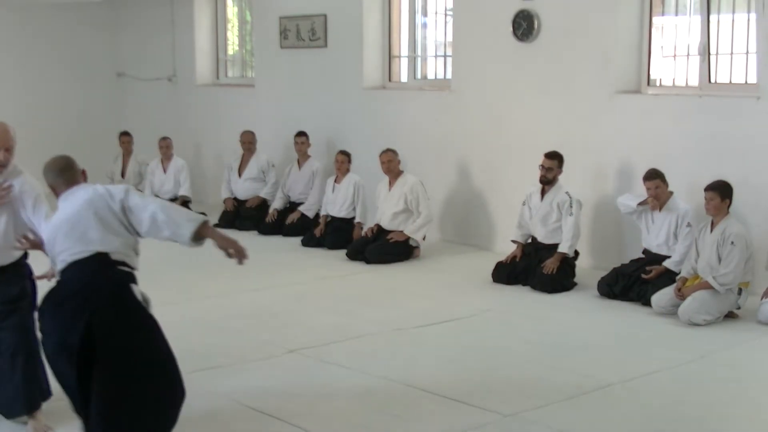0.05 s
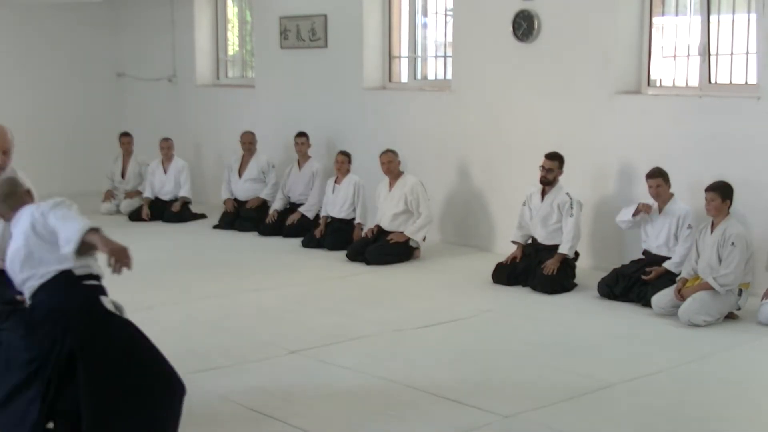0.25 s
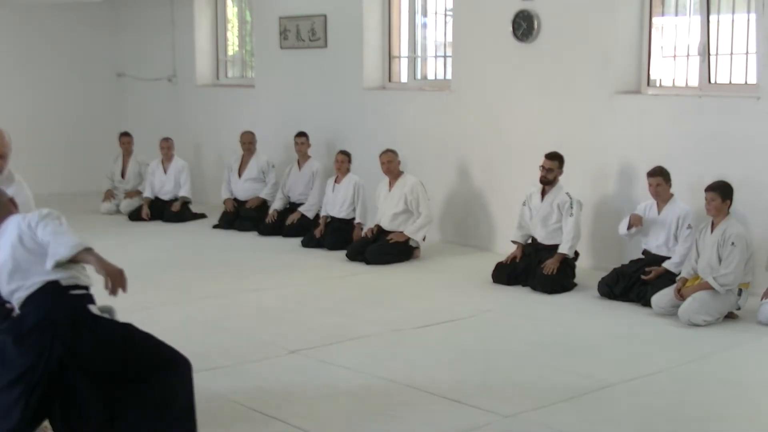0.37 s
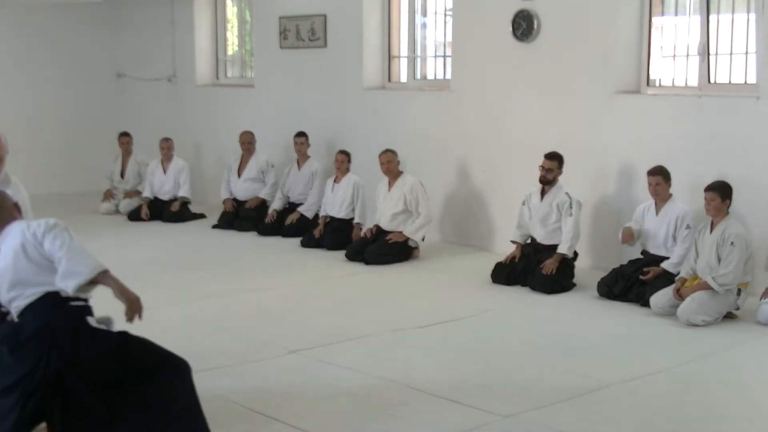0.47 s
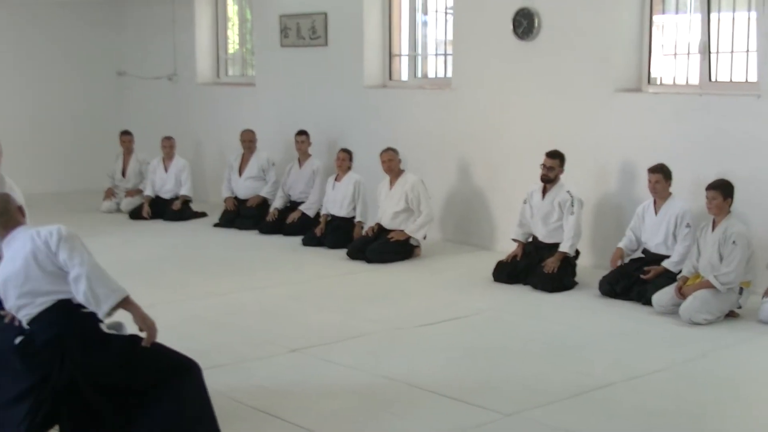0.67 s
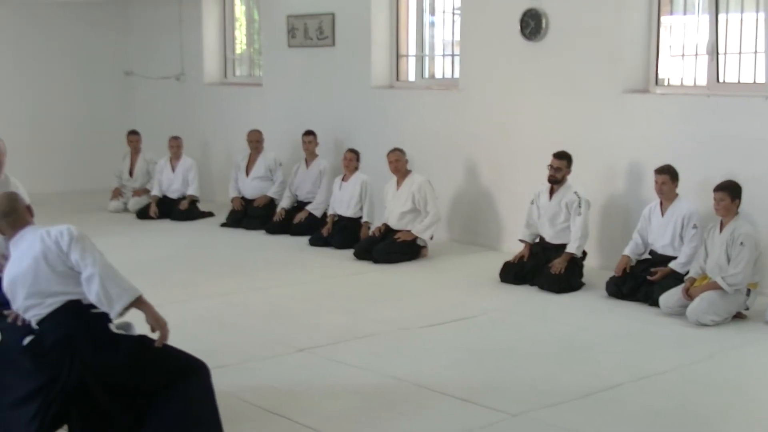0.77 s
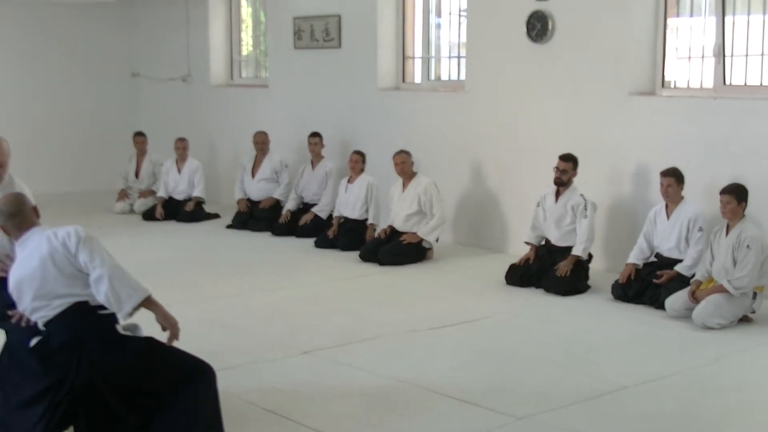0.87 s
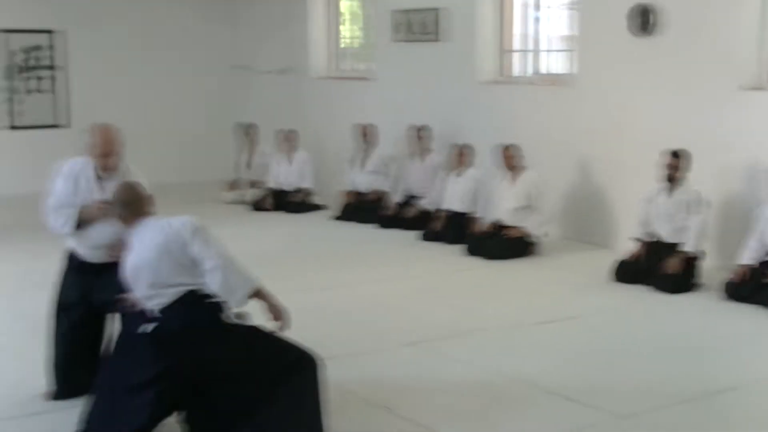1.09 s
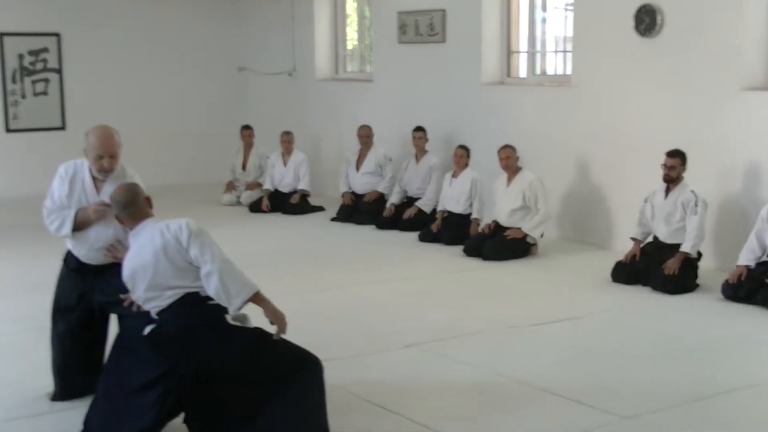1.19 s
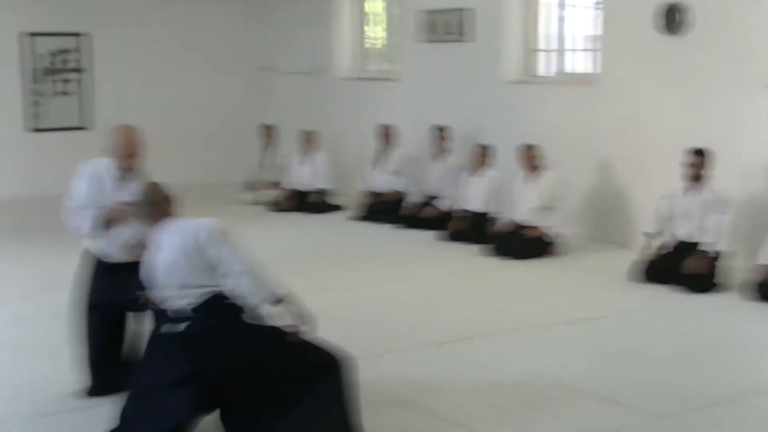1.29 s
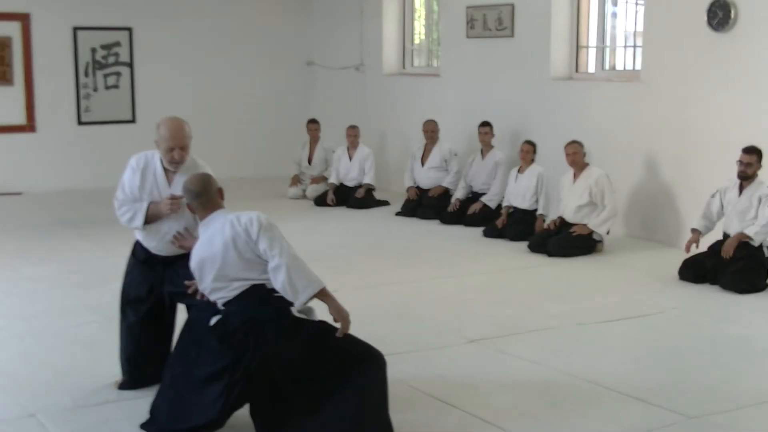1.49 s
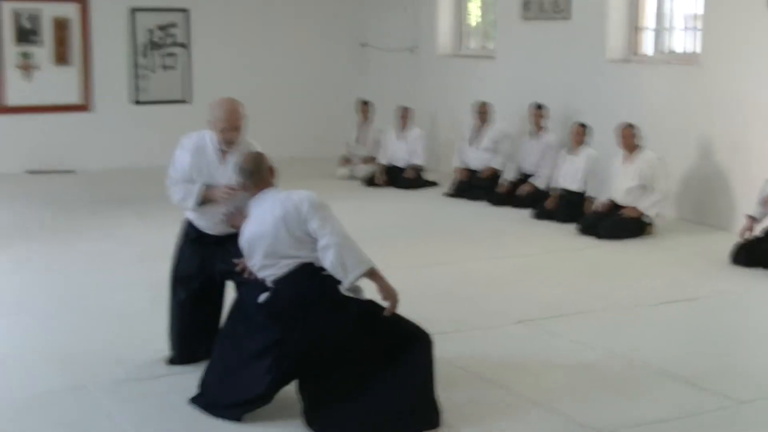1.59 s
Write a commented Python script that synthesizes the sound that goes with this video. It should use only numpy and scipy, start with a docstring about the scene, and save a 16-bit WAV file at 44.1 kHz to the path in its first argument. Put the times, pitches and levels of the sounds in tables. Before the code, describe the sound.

Heavy thud of a fall on a mat in a bare hall, then a nearby camera fires three times

```python
"""Mat landing and three camera frames

A body lands on a padded mat in a bare training hall: bounces sounding as damped oscillations make a deep
thud, bursts of coloured noise make the slaps, grainy hiss the swishing cloth, and a diffuse tail carries on.
Close by, a reflex camera fires three frames: each a hollow mirror clack of ringing body modes and noise,
then a bright shutter click with metal partials; a first curtain precedes it, very faintly in the last frame."""
import sys
import numpy as np
from scipy import signal
from scipy.fft import rfft, irfft
from scipy.io import wavfile
from scipy.ndimage import uniform_filter1d

SR = 44100
rng = np.random.default_rng(int(sys.argv[2]) if len(sys.argv) > 2 else 0)


def how_loud(loudness_db):
    """Turn decibels into a plain amplitude multiplier (0 dB gives 1, 20 dB gives 10)."""
    steps = np.asarray(loudness_db, float) / 20
    return 10 ** steps


def master_out(mix):
    """Clip the mix to full scale and print it as 16-bit PCM to the path in sys.argv[1]."""
    frames = np.transpose(np.atleast_2d(mix))
    ceiling = np.clip(frames, -1, 1)
    pcm = np.round(ceiling * 32767).astype(np.int16)
    wavfile.write(sys.argv[1], SR, pcm)


N = 72765  # length in samples
LEAD = 4410  # samples computed ahead of the start, so that earlier sounds can ring into it

# Room tone spectrum: f/Hz, relative level/dB
AIR_SPECTRUM = [(20, -4), (60, -4), (200, -4.5), (500, -7.5), (1000, -10.5), (1500, -14.5), (4000, -23),
                (9000, -29), (16000, -32)]
# Left-right likeness of the room tone: f/Hz, likeness/1
AIR_LIKENESS = [(60, 0.7), (240, 0.81), (950, 0.71), (3770, 0), (15000, -0.0)]
# Reverberation time of the hall: f/Hz, T60/s
HALL_T60 = [(60, 1.), (150, 0.65), (400, 0.63), (1000, 0.65), (3000, 0.86), (10000, 0.3)]
# Left-right likeness of the hall tail: f/Hz, likeness/1
HALL_LIKENESS = [(60, 1), (250, 0.98), (600, 0.96), (1500, 0.46), (6000, 0.033)]
# Course of the swishing cloth: t/s, level/dB
SWISH_COURSE = [(0.0, -41), (0.01, -44.5), (0.16, -52.5), (0.188, -48), (0.224, -28), (0.232, -59),
                (0.236, -30), (0.398, -48), (0.428, -32.5), (0.484, -44), (0.498, -33.5), (0.508, -45),
                (0.652, -58), (0.75, -63)]
# Spectrum of rubbing cloth: f/Hz, relative level/dB
CLOTH_SPECTRUM = [(410, -8.5), (700, 0), (757, -1), (886, -13), (1120, -12), (1520, -8), (2190, -6),
                  (5840, -11), (16000, -22)]
# Cloth and palms snapping on the mat cover: t/s, level/dB, hall send re slap/dB
SLAPS = [(.2125, -21.5, -8), (.2195, -15, -6), (0.2235, -22, -9), (.2255, -26, -8), (0.2365, -29, -16),
         (0.2397, -20.5, -0.5), (0.4975, -24, -23)]
# Spectrum of a slap: f/Hz, relative level/dB
SLAP_SPECTRUM = [(400, -23), (900, 1), (1600, 5.5), (2600, 4.5), (3500, -7.5), (6000, -5.5), (11500, -6.5),
                 (16000, -25)]
# Bodies and feet hitting the mat, the first just before the start:
# t/s, bounce level/dB, bounce f/Hz, swell/s, boom level/dB
THUMPS = [(-.05, -39, 220, 0.0069, 9), (0.2014, -2.5, 170.1, 0.02128, 14), (0.4357, -21.5, 504, .012, -4.5),
          (0.45, -24, 130, 0.01197, -3), (.49, -22, 100, 0.01867, -12.5)]
# Spectrum of the broad boom of a thump: f/Hz, relative level/dB
BOOM_SPECTRUM = [(25, -40), (60, -28), (100, -2.5), (190, -2), (300, -4.5), (480, -8), (900, -21.5),
                 (1500, -23.5), (3000, -51), (6000, -55)]
# Left-right likeness of the camera noise bursts: f/Hz, likeness/1
CRACK_LIKENESS = [(500, 0.31), (2000, 0.025), (6000, -0.58), (14000, 0.016)]
# Modes of the camera body: f/Hz, level/dB, T60/s, left over right/dB, left lag/rad
BODY_MODES = [(100, -21.5, 0.12, -27.5, .1), (194.6, -12.5, 0.1, -14.5, 0.18), (377, -3.5, 0.1, -8.5, 2.15),
              (441, -5, 0.091, 2.5, 2.76), (642, -8, 0.026, 16.5, 0.93), (833, -12.5, 0.041, 11, 1.5),
              (1080, -14.5, 0.037, 2, .5), (1168, -9, 0.029, -13, 1.75), (1376, -20.5, 0.017, -20, 0.4),
              (1836, -20.5, 0.071, -6, 0.55), (2490, -27, 0.026, -12, 0.48), (2845, -20, 0.019, -23, 1.4),
              (3570, -33, 0.036, -21, 1.2)]
# Mirror clacks: t/s, ring level/dB, crack level/dB, left over right/dB,
# brightness tilt of the ring/(dB per octave)
MIRRORS = [(1.0258, -15.5, -5, 4.5, 1), (1.2866, -21.5, -23, 0, 2), (1.5321, -21.5, -29.5, 4.5, 1.5)]
# Spectrum of the mirror's crack: f/Hz, relative level/dB
MIRROR_SPECTRUM = [(290, -6), (500, 0), (993, -7.5), (4600, -21), (5320, -12.5), (9270, -20.5),
                   (12100, -13), (14800, -22), (16400, -39)]
# Spectrum of parts settling after the clack: f/Hz, relative level/dB
RATTLE_SPECTRUM = [(200, -38), (500, 5), (1500, -8), (3000, -12), (5500, -17), (9000, -21), (16000, -69)]
# Shutter clicks: t/s, crack level/dB, ring level/dB, first curtain level/dB, body knock level/dB
SHUTTERS = [(1.0788, -13.5, -29.5, -18.5, -25), (1.339, -18, -32, -19.5, -37),
            (1.5851, -18.5, -32.5, -54, -37)]
# Spectrum of the shutter's crack: f/Hz, relative level/dB
SHUTTER_SPECTRUM = [(350, -6.5), (600, -12), (1060, -3), (2080, -12.5), (3070, 1.5), (4340, -6.5),
                    (5810, -4), (7240, -5.5), (7980, -8.5), (11900, -8), (16400, -19)]
# Partials of the metal shutter parts: f/Hz
METAL_HZ = [960, 1308, 1715, 2385, 3112, 3456, 4444, 5100, 5879, 8100, 9600, 13810]
# The same partials, one row each: level/dB, T60/s, left over right/dB, left lag/rad
METAL_MODES = [(1.5, 0.058, 4.5, .3), (-12, 0.072, -17.5, 0.88), (-17.5, .3, 5, 0.38),
               (-10, 0.026, 21, 1.5), (2.5, 0.017, -5.5, 0.6), (-16, 0.02, -9, 1.3), (-39, 0.15, 4, .3),
               (-3.5, 0.022, -19, .3), (-6.5, 0.1, 10, 1.13), (-3.5, 0.025, 19.5, 1.2), (-19, 0.019, 4, .6),
               (-39, 0.049, -5, .6)]

AIR_DB = -51
MAT_HALL_DB, CAMERA_HALL_DB = -11.5, -34  # sends into the hall
SLAP_T60_S, SLAP_LIKENESS = 0.018, 0.44
CLOTH_GRAIN_DB, CLOTH_LIKENESS = 1.5, 0.17
THUMP_START_DB, THUMP_T60_S, THUMP_RISE_S = -8, 0.02, 0.0023
OVERTONE_DB = -12.5  # relative to the bounce
NEAR_BOOM_DB = -28  # direct share of the boom
PUSH_S, PUSH_RISE_S = -0.004023, 0.00405  # the push on the walls peaks just before the swell ends
TREBLE_HZ, TREBLE_T60_SHARE = 4630, 0.55  # above this a burst dies faster
MIRROR_BOUNCE_S, MIRROR_BOUNCE_DB, MIRROR_CRACK_T60_S = 0.003, 4, 0.021
DAMP_S, DAMP_DB_PER_S = 0.0223, 1500  # the mirror comes to rest on its foam and stills the ring
RATTLE_DB, RATTLE_T60_S = -10, 0.12  # level relative to the ring
SETTLE_S, SETTLE_DB, SETTLE_T60_S = 0.021, -26, 0.03  # last tick after the clack, relative to the ring
CURTAIN_LEAD_S, CURTAIN_T60_S, SHUTTER_T60_S = 0.0057, 0.014, 0.024
RETURN_S = 0.0155  # the body knocks again this long after the shutter
EDGE_HZ = 15900
SIDE = np.array([[0.5], [-0.5]])  # splits a left-right difference evenly over the two channels


def read(points, hz):
    """Logarithmic frequency scale: interpolates a table linearly along it."""
    f, value = np.transpose(points)
    return np.interp(np.log(hz + 1), np.log(f + 1), value)


def add(mix, s, sound):
    """Superposition: adds a sound to the mix at time s, cut off where the mix ends."""
    part = mix[:, LEAD + round(s * SR):][:, :sound.shape[-1]]
    part += sound[..., :part.shape[1]]


def noise(size, spectrum, likeness):
    """Partial coherence: stereo noise of rms 1, the right side sharing a given part of the left."""
    hz = np.fft.rfftfreq(size, 1 / SR)
    left, other = rfft(rng.standard_normal((2, size)))
    c = read(likeness, hz) if np.ndim(likeness) else likeness
    right = c * left + np.sqrt(1 - c ** 2) * other
    x = irfft(np.array([left, right]) * how_loud(read(spectrum, hz)), size)
    return x / np.sqrt(np.mean(x ** 2))


def crack(db, t60, spectrum, likeness, rise=0.00031):
    """Impact noise: a burst with a brief linear rise and exponential decay, faster in the treble."""
    t = np.arange(4096) / SR
    x = noise(4096, spectrum, likeness)
    low = signal.lfilter(*signal.butter(2, TREBLE_HZ, fs=SR), x)
    low_decay = how_loud(-60 * t / t60)
    treble_decay = how_loud(-60 * t / t60 / TREBLE_T60_SHARE)
    return np.minimum(t / rise, 1) * how_loud(db) * (low_decay * low + treble_decay * (x - low))


def ring(modes, db, rise):
    """Modal synthesis: damped sines, each reaching the two sides with its own level and lag."""
    t = np.arange(8192) / SR
    total = np.zeros((2, 8192))
    for hz, mode_db, t60, pan_db, lag in modes:
        level = how_loud(db + mode_db + pan_db * SIDE - 60 * t / t60)
        total += level * np.sin(2 * np.pi * hz * t - lag * SIDE)
    return np.minimum(t / rise, 1) * total


def room_tone():
    """Stationary noise: a steady partly coherent hiss, weighted to the bass."""
    return how_loud(AIR_DB) * noise(N + LEAD, AIR_SPECTRUM, AIR_LIKENESS)


def hall(x):
    """Diffuse reverberation: convolution with noise decaying band by band, alike on both sides in the bass."""
    flat = noise(SR, [(20, 0), (20000, 0)], HALL_LIKENESS)
    hz, t, z = signal.stft(flat, SR, nperseg=512)
    decay = how_loud(-60 * t / read(HALL_T60, hz)[:, None])
    tail = signal.istft(z * decay, SR, nperseg=512)[1]
    # silent for 8 ms, then fades in
    tail = tail * np.clip((np.arange(tail.shape[1]) / SR - 0.008) / 0.0067, 0, 1)
    mono = x.mean(0)[None]
    return signal.fftconvolve(mono, tail / np.linalg.norm(tail[0]), axes=1)[:, :N + LEAD]


def swish():
    """Friction noise: cloth rubbing in the roll as hiss with a randomly modulated level."""
    s, db = np.transpose(SWISH_COURSE)
    t = (np.arange(N + LEAD) - LEAD) / SR
    grain = 10 * uniform_filter1d(rng.standard_normal(N + LEAD), size=100)  # about rms 1
    level = how_loud(np.interp(t, s, db, right=-90) + CLOTH_GRAIN_DB * grain)
    return level * noise(N + LEAD, CLOTH_SPECTRUM, CLOTH_LIKENESS)


def thump(db, hz, swell, boom_db):
    """Forced, then damped oscillation: the mat bounces ever harder as weight comes down; a boom meets the walls."""
    t = np.arange(4096) / SR
    swell_db = THUMP_START_DB * np.maximum(1 - t / swell, 0)
    decay_db = -60 * np.maximum(t - swell, 0) / THUMP_T60_S
    shape = np.minimum(t / THUMP_RISE_S, 1) * how_loud(swell_db + decay_db)
    turn = 2 * np.pi * hz * (t - swell)
    bounce = np.cos(turn) + how_loud(OVERTONE_DB) * np.cos(2 * turn - 0.6)
    air = how_loud(boom_db) * noise(4096, BOOM_SPECTRUM, 1.0)
    near = shape * (how_loud(db) * bounce + how_loud(NEAR_BOOM_DB) * air)
    # one clean zero-phase pulse for the walls
    pulse = irfft(how_loud(read(BOOM_SPECTRUM, np.fft.rfftfreq(4096, 1 / SR))))
    push = np.roll(pulse, round((swell + PUSH_S) * SR))
    boom = how_loud(boom_db) * np.minimum(t / PUSH_RISE_S, 1) * push / np.linalg.norm(push)
    return near, boom


def landing():
    """Impact radiation: thumps, direct slaps, and the booms and slaps sent to the walls."""
    mat, slaps, booms = np.zeros((3, 2, N + LEAD))
    for s, *row in THUMPS:
        near, boom = thump(*row)
        add(mat, s, near)
        add(booms, s, boom)
    for s, db, hall_db in SLAPS:
        slap = crack(db, SLAP_T60_S, SLAP_SPECTRUM, SLAP_LIKENESS)
        add(slaps, s, slap)
        add(booms, s, how_loud(hall_db) * slap)
    return mat, slaps, booms


def mirror(out, s, ring_db, crack_db, pan_db, tilt_db):
    """Modal excitation by impact: the mirror hits its stop, bounces and rattles; each clack has its own brightness."""
    modes = [(hz, db + tilt_db * np.log2(hz / 377), *rest) for hz, db, *rest in BODY_MODES]
    damping_db = DAMP_DB_PER_S * np.maximum(np.arange(8192) / SR - DAMP_S, 0)
    body = ring(modes, ring_db, 0.0035) * how_loud(pan_db * SIDE - damping_db)
    add(out, s, body)
    add(out, s + MIRROR_BOUNCE_S, how_loud(MIRROR_BOUNCE_DB) * body)
    snap = crack(crack_db, MIRROR_CRACK_T60_S, MIRROR_SPECTRUM, CRACK_LIKENESS, 0.0017)
    add(out, s, how_loud(pan_db * SIDE) * snap)
    # smoothing leaves a level flutter of about 3.3 dB rms
    grain = how_loud(26.25 * uniform_filter1d(rng.standard_normal(4096), size=64))
    rattle = crack(ring_db + RATTLE_DB, RATTLE_T60_S, RATTLE_SPECTRUM, CRACK_LIKENESS, 0.002)
    add(out, s, grain * rattle)
    tick = crack(ring_db + SETTLE_DB, SETTLE_T60_S, SHUTTER_SPECTRUM, CRACK_LIKENESS, 0.0014)
    add(out, s + SETTLE_S, tick)


def shutter(out, s, crack_db, ring_db, first_db, knock_db):
    """Impact and resonance: the first curtain rattles, the second snaps and rings, the body knocks."""
    metal = [(hz, *row) for hz, row in zip(METAL_HZ, METAL_MODES)]
    first = crack(first_db, CURTAIN_T60_S, SHUTTER_SPECTRUM, CRACK_LIKENESS)
    add(out, s - CURTAIN_LEAD_S, first)
    add(out, s, crack(crack_db, SHUTTER_T60_S, SHUTTER_SPECTRUM, CRACK_LIKENESS))
    add(out, s, ring(metal, ring_db, 0.0011))
    add(out, s + RETURN_S, ring(BODY_MODES, knock_db, 0.0072))


def camera():
    """Superposition of impacts: three mirror clacks, each followed by its shutter."""
    out = np.zeros((2, N + LEAD))
    for row in MIRRORS:
        mirror(out, *row)
    for row in SHUTTERS:
        shutter(out, *row)
    return out


def scene():
    """Direct and reverberant field: mat, cloth and camera in the hall over the room tone."""
    mat, slaps, booms = landing()
    shots = camera()
    wet = hall(booms + how_loud(MAT_HALL_DB) * mat + how_loud(CAMERA_HALL_DB) * shots)
    return (room_tone() + wet + swish() + slaps + mat + shots)[:, LEAD:]


def top_cut(x):
    """Nothing passes above the cut-off."""
    return signal.sosfilt(signal.butter(12, 16540, fs=SR, output="sos"), x)


def record(dry):
    """Band limitation: a linear-phase low-pass removes the extreme treble."""
    lowpass = signal.firwin(255, EDGE_HZ, fs=SR)[None]
    mix = signal.oaconvolve(dry, lowpass, "same")
    return top_cut(mix)


dry = scene()
out = record(dry)
master_out(out)
```